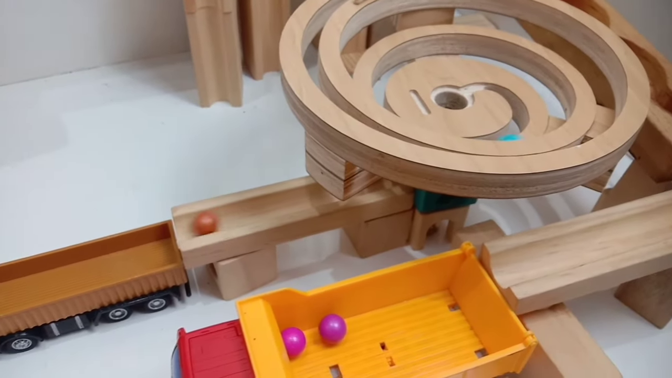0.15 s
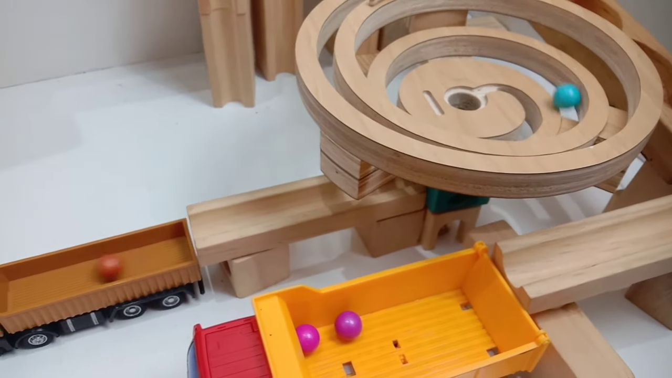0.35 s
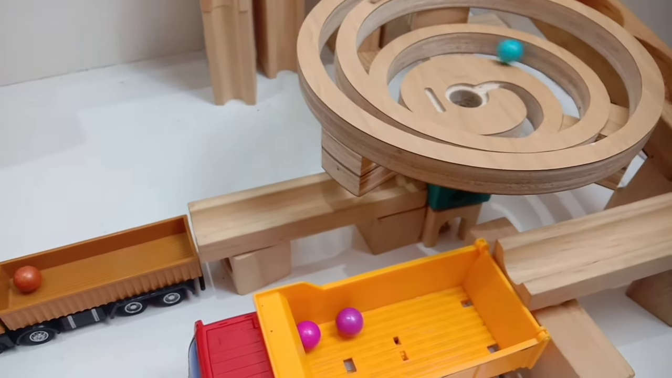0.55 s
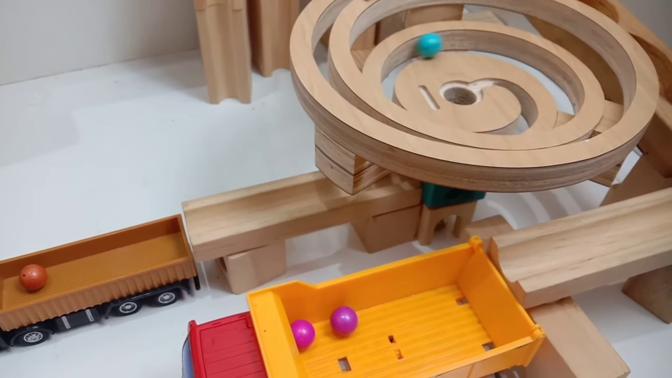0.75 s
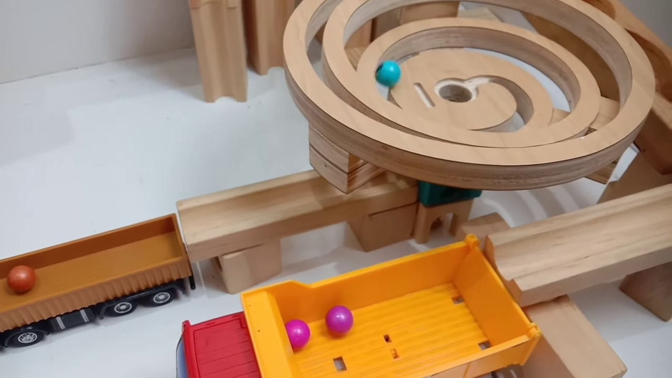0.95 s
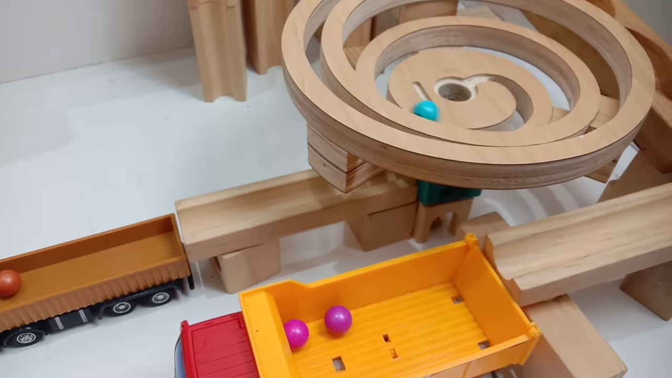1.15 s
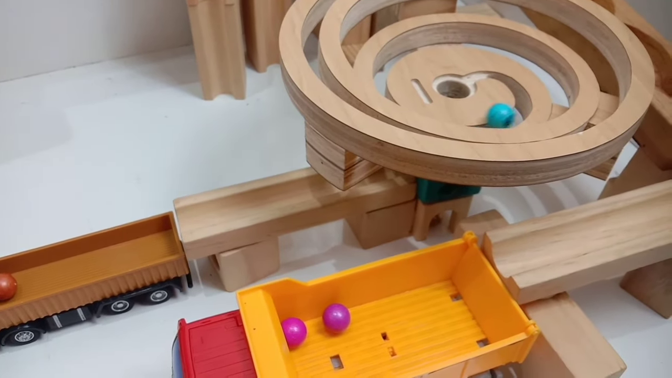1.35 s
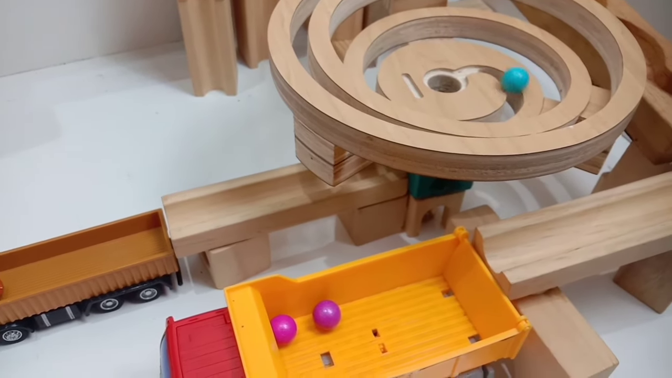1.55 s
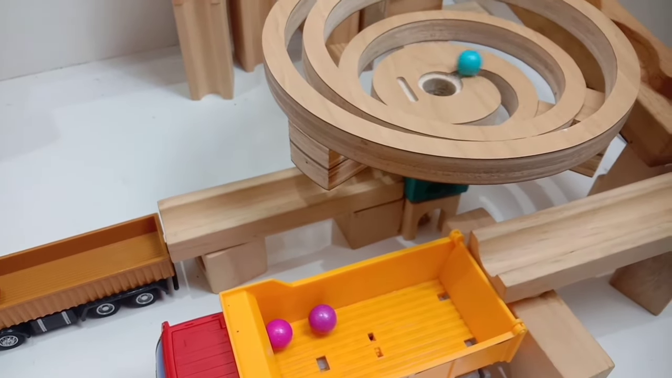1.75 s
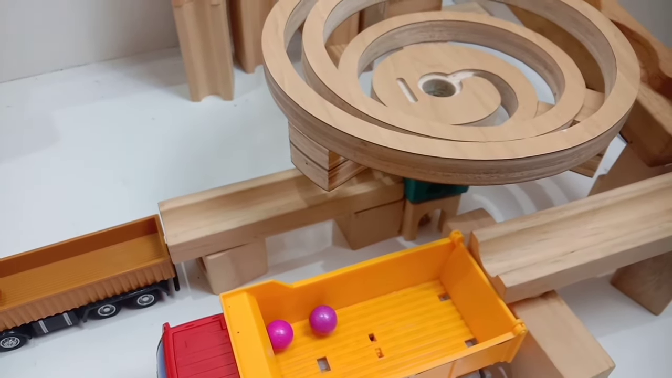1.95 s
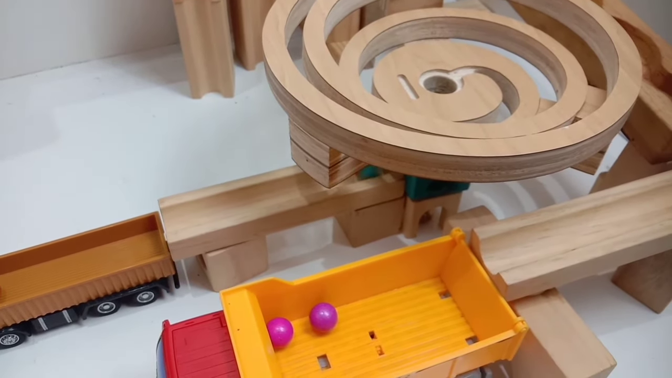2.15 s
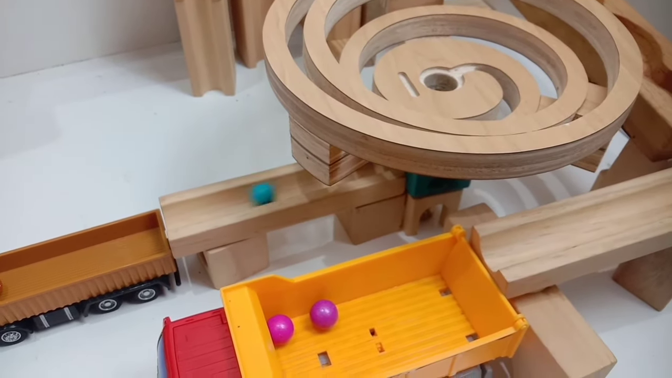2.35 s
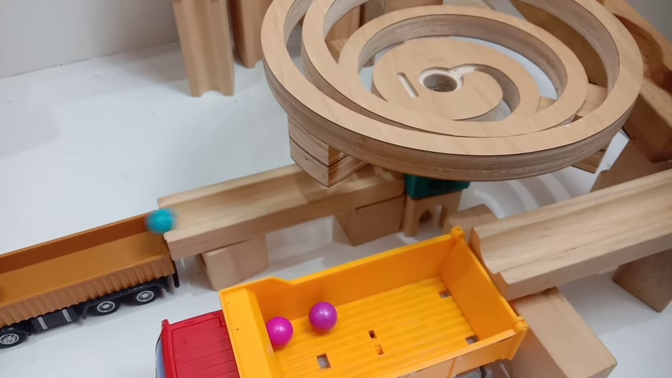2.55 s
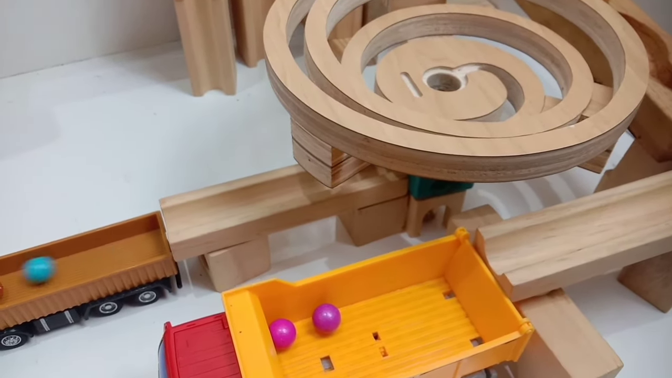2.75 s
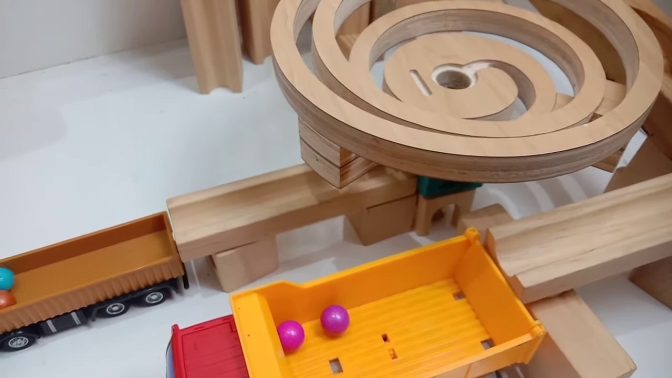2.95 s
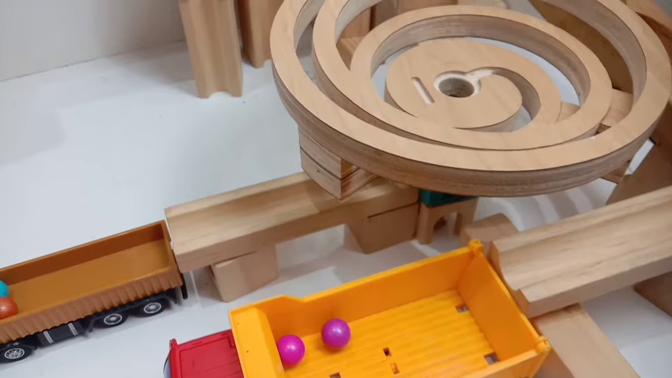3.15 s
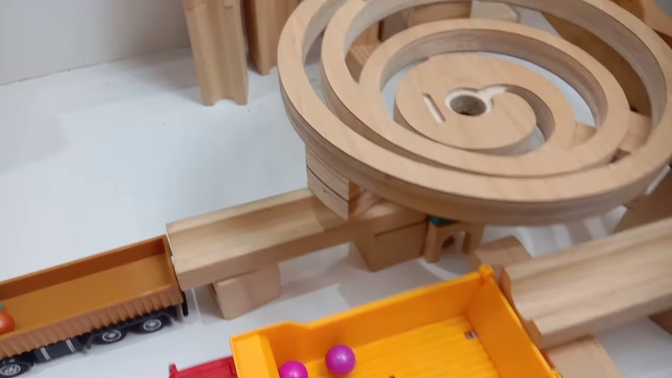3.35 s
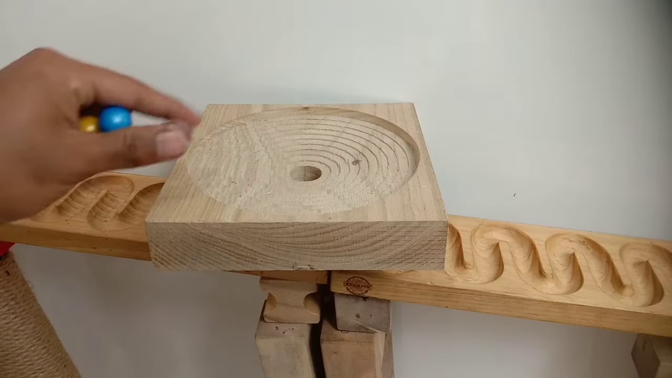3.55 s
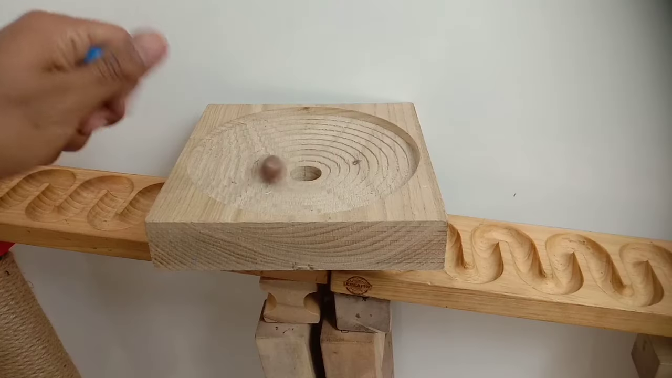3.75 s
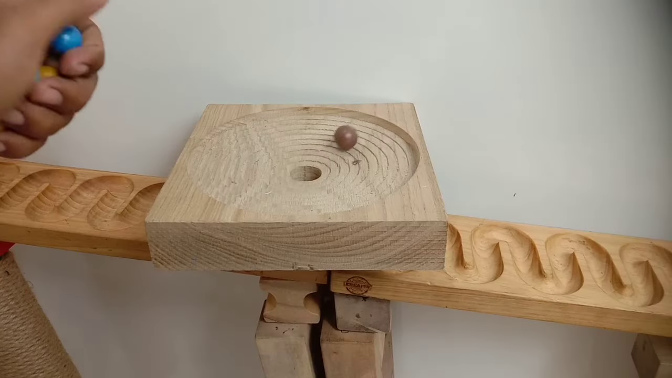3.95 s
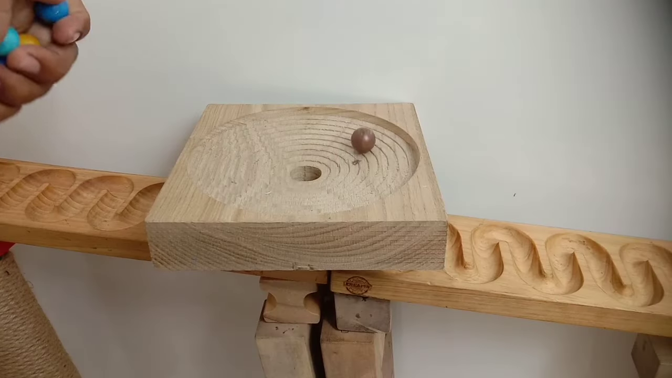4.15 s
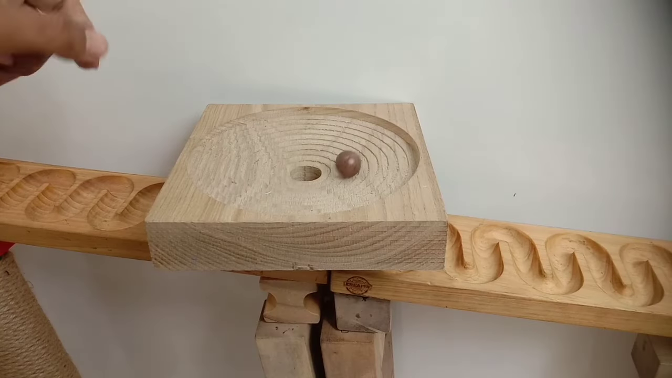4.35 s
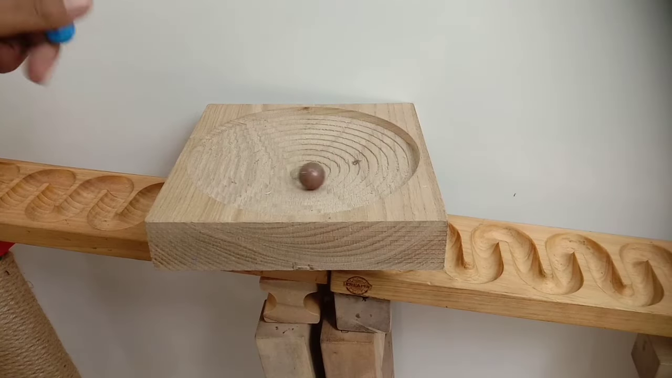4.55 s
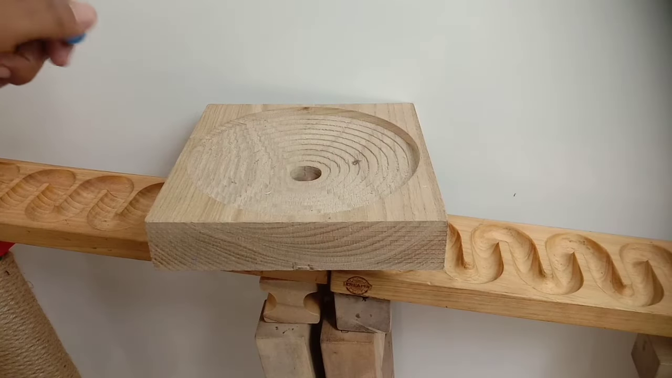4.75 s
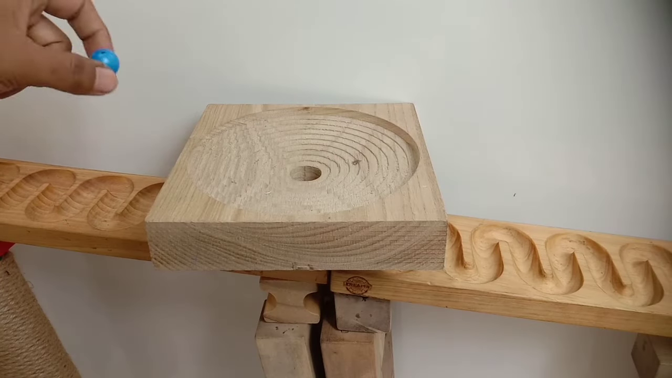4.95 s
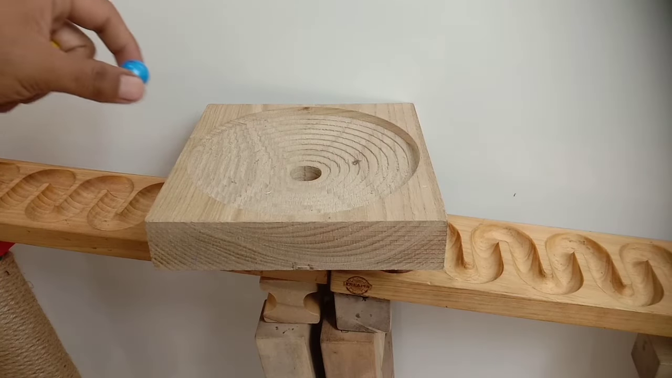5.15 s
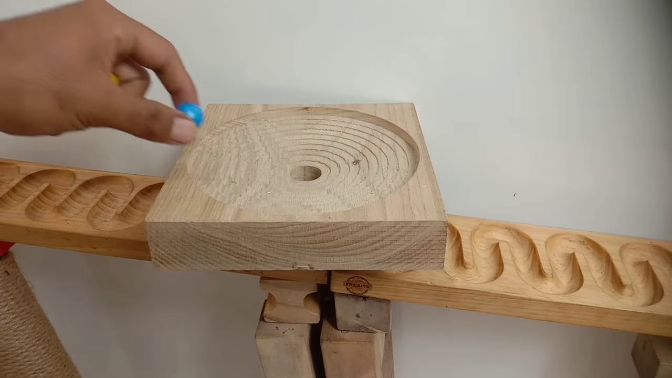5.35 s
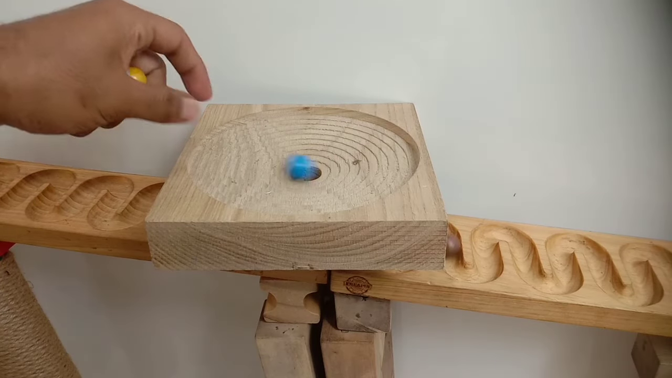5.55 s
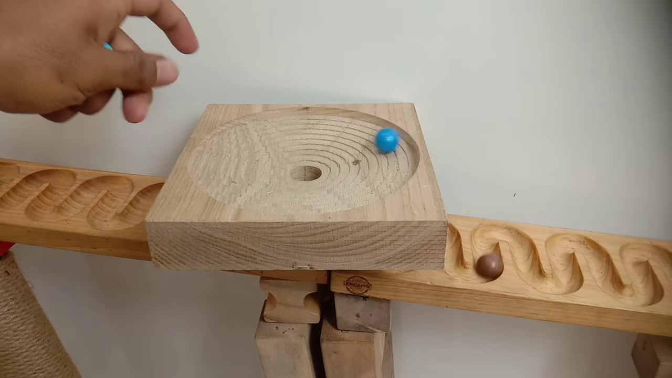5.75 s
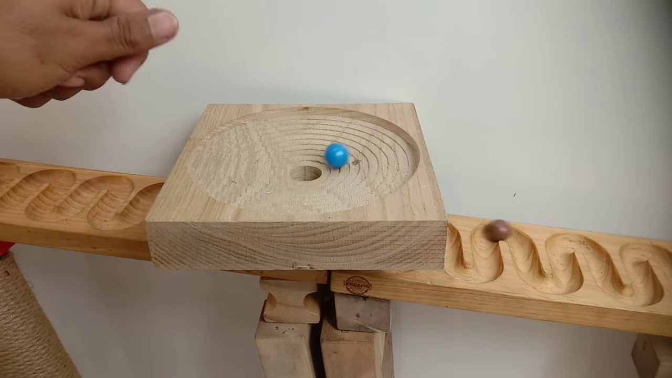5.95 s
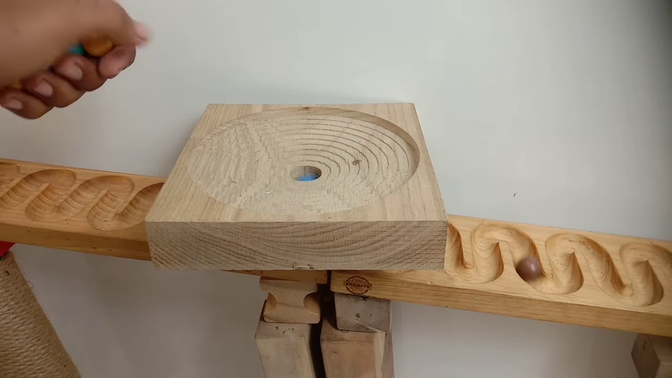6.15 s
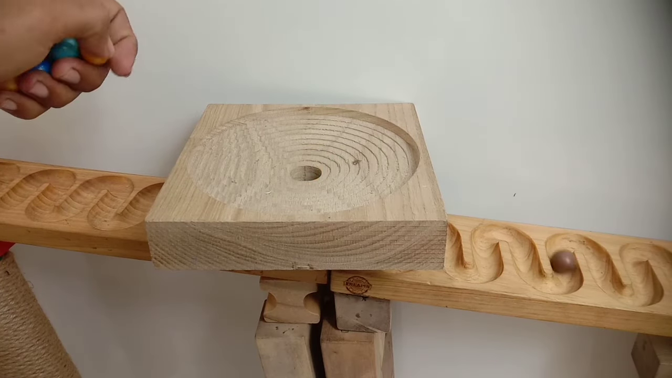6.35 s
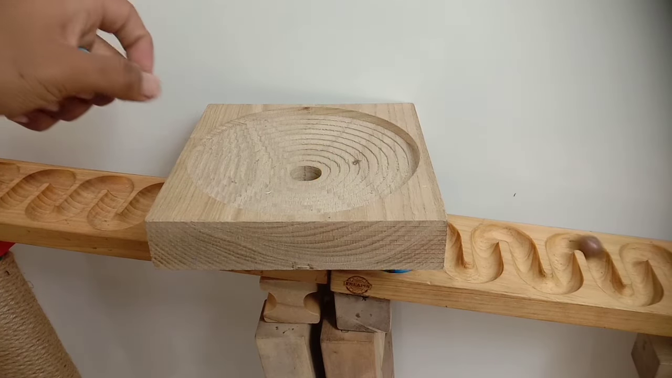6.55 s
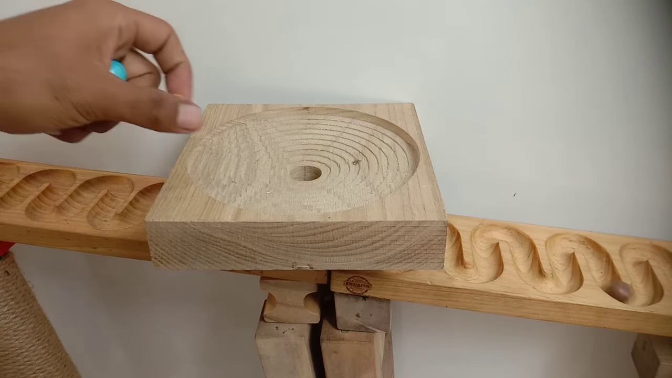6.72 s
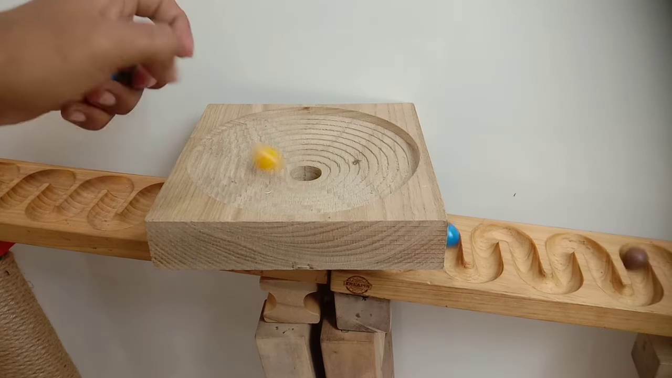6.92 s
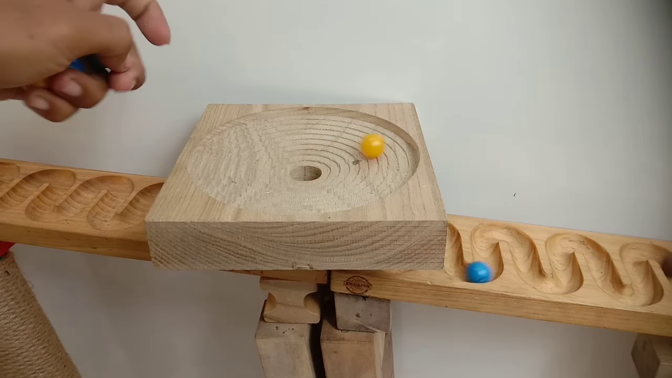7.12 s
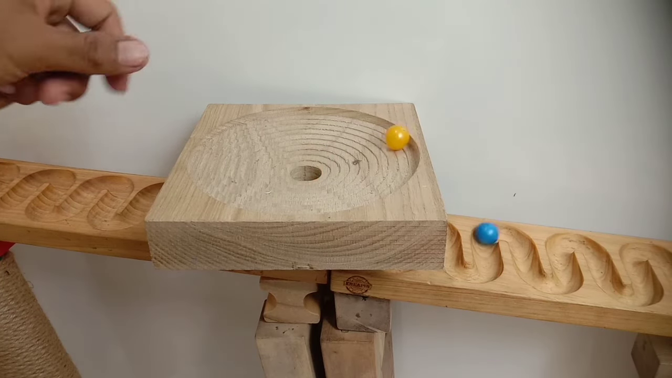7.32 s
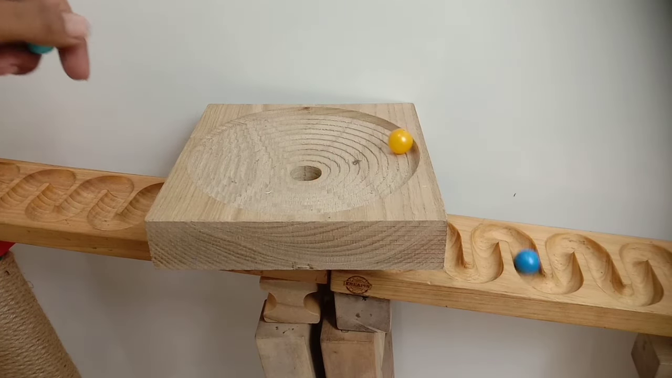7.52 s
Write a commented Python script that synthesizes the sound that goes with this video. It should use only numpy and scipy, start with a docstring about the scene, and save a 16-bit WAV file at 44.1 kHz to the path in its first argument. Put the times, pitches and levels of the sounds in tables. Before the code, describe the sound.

A marble circles a wooden spiral, drops down a chute and clatters into a plastic toy truck, then others knock through a wooden bowl and zigzag.

```python
"""A small, hard room with two wooden marble runs, heard one after the other.
On the first, a marble circles a spiral, drops down a chute and clatters into a plastic toy truck.
Abruptly the second takes over: marbles bounce in a thick wooden bowl, drop onto blocks and steps and
knock along a zigzag groove. Blows are noise cracks plus damped modes; rolling is a stream of tiny
bumps ringing the wood; the support booms, walls add reflections, and a quiet hush lies beneath."""
import sys
import numpy as np
from scipy import signal
from scipy.fft import rfft, irfft
from scipy.io import wavfile
from scipy.ndimage import uniform_filter1d

SR = 44100
rng = np.random.default_rng(int(sys.argv[2]) if len(sys.argv) > 2 else 0)


def dump_mix(stems):
    """Bounce the given channels to the path in sys.argv[1] as a 16-bit WAV at rate SR."""
    frames = np.atleast_2d(stems).T  # one column per channel
    limited = np.clip(frames, -1, 1)  # hard clip at full scale
    pcm = np.round(limited * 32767).astype(np.int16)
    wavfile.write(sys.argv[1], SR, pcm)


N = 338688

CHANGE_S = 3.43  # the second run takes over
EDGE_HZ = 16000  # upper band limit

# Table levels are relative: each part or track adds its own trim. Blows on each part: (time [s], clack level
# [dB], treble re clack [dB], bass re clack [dB]) The chute's table also holds the weak knocks at 3.17-3.34 s:
# marbles knocking in the truck's trailer, played with the chute's colour
TRUCK_HITS = [(.2654, -14, 1.5, -19), (.5047, -14.5, 2, -16.5), (2.6095, -25.5, 10.5, -18),
              (2.6127, -15, -1, -23.5), (2.783, -24.5, 9.5, -16.5), (2.789, -15, 3, -18.5),
              (2.899, -25.5, -2, -17.5), (2.9917, -26.5, -3.5, -15.5)]
SPIRAL_HITS = [(.925, -55, -3, -13), (1.0195, -43, -7, 7), (1.1035, -37.5, -4.5, -17),
               (1.1397, -39, -7, -10), (1.2055, -38, 1, -12), (1.2613, -39.5, -11, -13),
               (1.297, -44.5, -12, -5), (1.446, -42, -13.5, -14), (1.491, -43, -18, -2),
               (1.655, -44.5, -10, 7)]
CHUTE_HITS = [(1.845, -52, -8, 19), (1.899, -51, -6.5, 8), (1.9238, -16, 1, 0.5), (1.9992, -21.5, -8, 6.5),
              (2.0145, -22, 2, -4.5), (2.1275, -26.5, -15.5, 7), (2.1725, -16.5, -9.5, -4.5),
              (2.421, -56, -9.5, 11), (3.1696, -44.5, -0.5, 4.5), (3.277, -44, -3.5, 0.5),
              (3.344, -39.5, -2.5, 4), (3.3697, -18.5, 5, -2), (3.396, -21.5, 15, 11.5),
              (3.419, -19.5, 0.5, -4.5)]
BOWL_HITS = [(3.5906, -25.5, -3, -11.5), (3.603, -21.5, 2, -10), (3.6807, -20.5, -8, -11),
             (3.7437, -20.5, -6.5, -10.5), (3.791, -40, -16, 1), (3.809, -37, -1.5, 6.5),
             (3.835, -37, -6, 4.5), (3.8615, -27.5, -12.5, -16), (3.8825, -24.5, -10, -11),
             (3.9263, -26.5, -9.5, -12), (4.1495, -50, -11, 13), (4.1925, -66, -22, 15.5),
             (4.5997, -48, -27, 5), (4.6544, -37.5, -11, -0.5), (4.7447, -35, -5.5, -5),
             (5.4675, -16.5, 0, -7.5), (5.519, -28.5, -9.5, -9), (5.5445, -37, 1, -11),
             (5.635, -40.5, 3.5, 10), (5.6852, -30.5, -1.5, 3), (5.7207, -32.5, -1, 9.5),
             (5.946, -39.5, -15, -6), (5.98, -41.5, -10, -2), (6.014, -27, -12.5, -10),
             (6.1063, -27, -0.5, -13), (6.8418, -15.5, -3.5, -9), (6.9301, -16, -6, -11.5),
             (6.9933, -16, -1.5, -10), (7.061, -16.5, -5.5, -16)]
BLOCK_HITS = [(4.2635, -15.5, -6, -4), (4.305, -28, -7, -1.5), (4.3388, -31.5, -5, 10.5),
              (4.349, -40, -4, -5), (4.47, -76, -14, 16), (4.543, -72, -13, 26.5), (4.57, -68.5, -11, 15)]
ZIGZAG_HITS = [(4.999, -20, -1, -9), (5.0829, -18.5, 0.5, -3.5), (5.525, -27.5, -12, -11.5),
               (6.0655, -33.5, -17, -11), (6.3233, -31.5, -16, -10.5), (6.3752, -30.5, 0.5, 3),
               (6.407, -24, -11, -4), (6.429, -22.5, -12, -23), (6.4345, -20.5, 2, -14),
               (6.471, -32, 4.5, -2), (6.485, -27.5, -12, -5.5), (6.4985, -31.5, -12, -8),
               (6.52, -39.5, -10, -0.5), (6.609, -40, -16, -4), (6.629, -30.5, -13.5, -8),
               (6.719, -31.5, -12, -9.5), (6.7393, -33, -11.5, -4), (6.808, -44, -22, -6.5),
               (7.1002, -30.5, -8, -10), (7.1555, -31.5, -3, -15), (7.1902, -30, -13.5, -9),
               (7.231, -42, -2, 10), (7.277, -51, -14, 3), (7.3337, -56, -26, 5), (7.355, -44, -23, -16),
               (7.429, -47, -20, -3), (7.4675, -28, -7, -12.5), (7.507, -41, -13, -14),
               (7.5546, -38.5, -4, -9), (7.5907, -31, -13, -8), (7.605, -28, -2, -10), (7.618, -42, -7, 1)]
# The loose truck jumps and rattles just after a marble lands in it: same columns
TRUCK_RATTLES = [(.3165, -19, -4.5, -13), (2.657, -19.5, -3.5, -10.5)]
# Steps and edges, where every spot has two pitches of its own:
# (time [s], clack level [dB], treble re clack [dB], bass re clack [dB], hollow pitch [Hz], bright pitch [Hz])
STEP_HITS = [(4.008, -29, -15.5, 1.5, 1300, 2640), (4.7613, -18, -9.5, -3, 1254, 2770),
             (4.778, -31, -14, -0.5, 1490, 2880), (4.8285, -24.5, -12.5, 0, 1236, 2130),
             (4.835, -26.5, -20, -3.5, 1530, 2880), (4.887, -26.5, -8.5, -6.5, 1300, 2480),
             (4.9014, -33.5, -16.5, 13, 1290, 2950), (4.951, -42, -14, 0, 1280, 3250),
             (4.9614, -18, -3.5, -2, 1240, 5910), (5.0326, -18.5, -5, 1, 1110, 4130),
             (5.1386, -17, -0.5, -2.5, 1547, 5905), (5.794, -37.5, -16, -8, 1050, 1980),
             (5.805, -33.5, -4.5, 1, 1060, 2410), (6.1363, -29, -9, -7.5, 1220, 3280),
             (6.1654, -40, -4, 3, 1230, 3250), (6.183, -23.5, -8, -6.5, 1280, 3230),
             (6.1895, -20, -11, -2, 1330, 2880), (6.212, -30, -25, -5, 1230, 2560),
             (6.2517, -39, -17, 0, 1470, 2400), (6.291, -35, -11.5, 6, 1260, 2760)]
# How those two pitches ring, before weak blows shorten them: (level [dB], t60 [s])
SPOT_RINGS = [(9.5, 0.022), (2, 0.022)]

# Colour of the crowded, short-lived modes in each part: (frequency [Hz], density [dB per Hz])
TRUCK_BODY = [(47, -60), (80, -6), (156, -20), (212, -9), (271, -21), (461, -30), (751, -17), (958, -21),
              (1430, -7), (3390, -3.5), (4420, 0.5), (5050, -5.5), (6740, 0.5), (8050, -15), (16000, -33.5)]
SPIRAL_BODY = [(300, -18.5), (1500, 13), (3500, 2.5), (4600, 4), (5200, -22.5), (5800, 3), (7200, -5),
               (8500, -44), (15000, -49.5)]
CHUTE_BODY = [(47, -43.5), (80, -22.5), (212, -5), (431, -14), (588, -7), (896, -8), (1250, -2.5),
              (1630, -0.5), (2540, -2), (2780, 1), (3870, -9), (6170, -5), (6740, -10.5), (14600, -51),
              (16000, -101)]
BOWL_BODY = [(90, -15), (300, -2.5), (750, 1), (1100, 8.5), (2100, 3), (2700, 8), (4000, 6.5), (5200, -6),
             (6200, -2.5), (7000, -8), (8000, -25), (10000, -46), (15000, -48)]
BLOCK_BODY = [(90, -25), (230, -5), (400, -1.5), (570, -1), (1200, 0), (1600, -9), (2400, -7), (3000, -5.5),
              (3400, -6.5), (3800, -4), (5000, -10.5), (6300, -12), (7000, -12), (7800, -29), (15000, -35)]
STEP_BODY = [(88, -16.5), (150, -26), (193, -12.5), (348, -9), (494, -18.5), (730, -6), (923, -13.5),
             (1260, 0.5), (1720, -16.5), (1870, -9), (6020, -15.5), (8400, -27.5), (13200, -38),
             (14800, -34), (16000, -44.5)]
ZIGZAG_BODY = [(47, -24), (80, -37.5), (242, -4.5), (493, -19.5), (657, -4), (958, -10), (1250, -11.5),
               (1700, -12.5), (1860, -6.5), (2720, -9.5), (3170, -5), (4420, -16.5), (6450, -20),
               (7200, -39), (16000, -92.5)]

# Clear modes of each part, before detuning and damping: (frequency [Hz], level [dB], t60 [s])
TRUCK_MODES = [(1290, -3, 0.033), (2120, 0, 0.084), (3810, 10.5, 0.022), (4403, -9, 0.058),
               (4600, -17.5, 0.028), (5790, 14, 0.019), (5770, -13, 0.027), (6000, -12, 0.017)]
SPIRAL_MODES = [(582, -3, 0.17), (650, -11.5, 0.045), (985, 0, .05), (1565, 2, 0.013)]
CHUTE_MODES = [(595, -6, .08), (1010, -9, .06), (1253, -3, .06), (2750, -1, .09), (4830, -14, .07),
               (5290, -6, .04), (5960, 4, .03), (6150, 2, .03)]
BOWL_MODES = [(1012, -11, .13), (1088, -12, .13), (1238, -15, .08), (2070, -20, .09), (2565, -11, .09),
              (2880, -18, .04), (3245, -2, .11), (3295, -4, .07), (3430, -11, .045), (3596, -14, .06),
              (4016, -5, .1), (4780, -18, .07), (5930, -15, .06), (6420, -15, .07)]
BLOCK_MODES = [(577, 1, .1), (715, -1, .08), (1235, -2, .2), (3040, -2, .14), (3100, -5, .1),
               (3740, -3, .06), (4890, -5, .12), (4970, -7, .1), (6900, -17, .1)]
STEP_MODES = [(1000, -13.5, 0.04), (1280, -15, 0.15), (1491, -11.5, 0.21), (3010, -10, 0.028)]
ZIGZAG_MODES = [(1250, -6, 0.13), (1835, 3, 0.11), (2360, -1, 0.06), (3050, -5, 0.05), (3240, 2, 0.1),
                (4070, -5, 0.04), (4840, -4, 0.035), (6380, -10, 0.04)]
# Modes that rolling excites: (frequency [Hz], level [dB], t60 [s])
BOWL_ROLL_MODES = [(940, -8, 0.18), (1096, 24, 0.17), (1240, 18.5, 0.3), (2600, -24, 0.038),
                   (3180, -23.5, 0.092)]
ZIGZAG_ROLL_MODES = [(250, -4, 0.1), (645, 4, 0.1), (1260, 0, 0.12), (1850, 9, 0.1), (1950, 4, 0.08),
                     (2360, -2, 0.06), (3240, 0, 0.1)]
RAMP_MODES = [(230, -1, 0.21), (356, 7, 0.2), (543, -1.5, 0.14), (762, 0.5, 0.27), (1160, -8, 0.043)]

# Stretches of rolling on each track: (start [s], end [s], wood level [dB], grit level [dB])
SPIRAL_ROLL = [(0, 1.86, -36, -62)]
BOWL_ROLL = [(3.58, 3.72, -38, -68), (3.74, 4.02, -37, -70), (4.13, 4.23, -38.5, -71),
             (4.58, 4.76, -51.5, -79), (5.48, 5.66, -36, -62), (5.72, 5.79, -31.5, -66),
             (5.97, 6.1, -43.5, -63), (6.92, 7.14, -39, -59), (7.23, 7.28, -46, -62)]
ZIGZAG_ROLL = [(5.75, 5.88, -55, -77), (6.13, 6.26, -38.5, -60), (6.29, 6.53, -39, -60),
               (6.61, 6.66, -45, -68), (6.73, 6.82, -41, -73), (7.1, 7.28, -43.5, -58),
               (7.32, 7.42, -47.5, -70), (7.43, 7.68, -43, -50)]
RAMP_ROLL = [(-.05, .08, -32, -47), (.1, .21, -38.5, -52.5), (2.2, 2.4, -41.5, -81),
             (2.41, 2.51, -32.5, -77.5), (3.28, 3.4, -47, -65), (3.54, 3.59, -45, -82),
             (4.14, 4.24, -49.5, -70.5), (4.35, 4.44, -46, -80), (4.54, 4.86, -41.5, -87.5)]
# Colour of the rolling noise in the wood: (frequency [Hz], density [dB per Hz])
SPIRAL_RUMBLE = [(40, -34.5), (100, -12), (210, -5.5), (320, -11), (480, -2), (600, 4.5), (800, -7.5),
                 (1100, -3), (1700, -12.5), (2500, -22.5), (4500, -30.5), (7000, -46), (10000, -77)]
BOWL_RUMBLE = [(40, -34), (100, 17), (170, -1), (330, 10), (500, -21), (750, 5.5), (900, -2.5),
               (1100, 14.5), (1350, -15), (1650, -10), (2700, -15.5), (5000, -42.5), (7000, -45),
               (10000, -57.5)]
ZIGZAG_RUMBLE = [(40, -29.5), (100, -3.5), (170, -3.5), (320, 9), (480, -11), (660, 1), (950, -3.5),
                 (1300, -5.5), (1900, 0.5), (2800, -16), (5000, -43), (6500, -25), (9000, -66)]
RAMP_RUMBLE = [(40, -24), (110, -4.5), (210, 6.5), (300, -3), (480, 0), (800, -2), (1250, -6), (1800, -34),
               (3500, -41), (7000, -40), (10000, -80.5)]
# Loudness of the circling marble: (time [s], level [dB])
SPIRAL_SWELL = [(0, -5.5), (.6, -1), (.75, -0.5), (1, 0.5), (1.15, 4), (1.32, 1.5), (1.42, -1.5), (1.6, -3),
                (1.68, 3.5), (1.8, 1), (1.85, 1)]

# Two heavy drops make the whole support boom: (time [s], level [dB])
HEAVY_DROPS = [(4.968, -34.5), (5.038, -33)]
# Low modes of the support: (frequency [Hz], level [dB], t60 [s])
SUPPORT_MODES = [(91.6, -2.5, .45), (115, 8, .5), (140, -10, .4), (212, -9, .27)]
# Decay of the room: (frequency [Hz], t60 [s])
ROOM_T60 = [(100, 0.56), (400, 0.42), (1200, 0.26), (3500, 0.24), (7000, 0.22), (14000, 0.19)]
# Colour of the background hush: (frequency [Hz], density [dB per Hz])
HUSH = [(30, -27.5), (110, -0.5), (400, -18.5), (1200, -3.5), (3000, -23.5), (7000, -27.5), (13000, -36.5),
        (15000, -25)]

# the sharpest clacks reach furthest above the treble
SHEEN_PER_DB = 0.98  # dB per dB of treble
# blows weaker than HARD_DB stay longer in contact, which shortens the ring
HARD_DB, DAMPING_PER_DB = -22.5, 0.06
# a wall's echo, whose delay shifts as the marble travels
ECHO_S, ECHO_SWING_S, ECHO_DB = .0045, 0.00055, -7.5


def spiral_run():
    """First run: a marble rolls round the spiral, strikes its way down the chute and into the truck."""
    roll = rolling(SPIRAL_ROLL, SPIRAL_RUMBLE, SPIRAL_MODES, level_db=-4.0, ring_db=-1, grit_db=4.5,
                   rise_s=.03, slowing_db_per_s=2, release_s=0.18,
                   bumps_per_s=1500, wobble_db=2, ridge_db=8, wander=.04)
    swell = amp(np.interp(np.arange(N) / SR, *np.transpose(SPIRAL_SWELL)))
    spiral = knocks(SPIRAL_HITS, SPIRAL_BODY, SPIRAL_MODES, level_db=-3.5, crack_t60=0.062,
                    ring_db=-10.5, room_db=-7.5, sheen_db=15, thump_db=-32)
    chute = knocks(CHUTE_HITS, CHUTE_BODY, CHUTE_MODES, level_db=-3.0, crack_t60=0.056,
                   ring_db=-5, room_db=-4.5, sheen_db=-9, thump_db=-28,
                   chatter_s=0.054, chatter_db=-16, count=4)
    truck = knocks(TRUCK_HITS, TRUCK_BODY, TRUCK_MODES, level_db=-2.0, crack_t60=0.029,
                   ring_db=-4.0, room_db=-4.5, sheen_db=-2.5, thump_db=-39.5)
    rattle = knocks(TRUCK_RATTLES, TRUCK_BODY, TRUCK_MODES, level_db=-4.5, crack_t60=0.033,
                    ring_db=-4.0, room_db=-1, sheen_db=3, thump_db=-23.5,
                    chatter_s=.045, chatter_db=-4.5, count=4)
    return whistle() + roll * swell + spiral + chute + truck + rattle


def bowl_run():
    """Second run: marbles strike and roll in the bowl, land on blocks and steps, and follow the zigzag."""
    bowl_roll = rolling(BOWL_ROLL, BOWL_RUMBLE, BOWL_ROLL_MODES, level_db=-0.5, ring_db=-2.0, grit_db=-10.0,
                        rise_s=0.015, slowing_db_per_s=-9, release_s=0.13,
                        bumps_per_s=500, wobble_db=4, wander=.02)
    zigzag_roll = rolling(ZIGZAG_ROLL, ZIGZAG_RUMBLE, ZIGZAG_ROLL_MODES, level_db=2, ring_db=4.5, grit_db=-2.5,
                          rise_s=0.022, slowing_db_per_s=-4, release_s=0.14,
                          bumps_per_s=400, wobble_db=4.5, ridge_db=15, wander=.015)
    # the thick, solid bowl rings clearly
    bowl = knocks(BOWL_HITS, BOWL_BODY, BOWL_MODES, level_db=-3, crack_t60=.045,
                  ring_db=5, room_db=-7.0, sheen_db=10.0, thump_db=-32.5)
    block = knocks(BLOCK_HITS, BLOCK_BODY, BLOCK_MODES, level_db=-0.5, crack_t60=0.019,
                   ring_db=0.0, room_db=-5.5, sheen_db=-6, thump_db=-27.5)
    steps = knocks(STEP_HITS, STEP_BODY, STEP_MODES, level_db=-3.0, crack_t60=0.042,
                   ring_db=3.5, room_db=-6.5, sheen_db=-2.5, thump_db=-29.5,
                   chatter_s=.035, chatter_db=-21.5, count=3)
    zigzag = knocks(ZIGZAG_HITS, ZIGZAG_BODY, ZIGZAG_MODES, level_db=-2.5, crack_t60=0.096,
                    ring_db=5.0, room_db=-9.5, sheen_db=8.0, thump_db=-33.5)
    return bowl_roll + zigzag_roll + bowl + block + steps + zigzag


def knocks(hits, body, modes, level_db, crack_t60, ring_db, room_db, sheen_db, thump_db,
           chatter_s=.012, chatter_db=-12, count=1, contact_s=0.00078):
    """Each blow cracks with crowded modes, rings the clear ones, chatters and shakes the support."""
    t = np.arange(SR // 5) / SR
    out = np.zeros(N)
    for s, clack_db, treble_db, bass_db, *spot_hz in hits:
        crack = colour(rng.standard_normal(len(t)) * dying(t, crack_t60), body)
        own_modes = modes + [(hz, db, t60) for hz, (db, t60) in zip(spot_hz, SPOT_RINGS)]
        # each mode is slightly detuned; weak blows damp it
        free = np.exp(DAMPING_PER_DB * min(clack_db - HARD_DB, 0))
        own_modes = [(hz * rng.uniform(.994, 1.006), db, t60 * free) for hz, db, t60 in own_modes]
        tone = ring(own_modes, t, spread_db=2.5)
        contact = 1 - np.exp(-(t / contact_s) ** 2)  # soft onset
        touch = (evened(crack) + amp(ring_db) * evened(tone)) * contact
        # the marble touches again, count times; later touches are weaker
        blow = touch.copy()
        for late in rng.uniform(.25, 1, count):
            add(blow, chatter_s * late, amp(chatter_db) * (1.5 - late) * touch)
        out_of_balance = tone_balance(blow, treble_db, bass_db, sheen_db)
        blow = colour(blow, out_of_balance)
        add(out, s, blow * amp(level_db + clack_db - band_db(blow, 1500, 12000)))
    booms = thumps([(s, clack_db + thump_db) for s, clack_db, *_ in hits])
    return out + amp(room_db) * room(out) + booms


def tone_balance(blow, treble_db, bass_db, sheen_db):
    """Equaliser curve that steers a blow's bass and treble relative to its clack."""
    clack_now_db = band_db(blow, 1500, 12000)
    low_db = bass_db + clack_now_db - band_db(blow, 150, 1300)
    high_db = treble_db + clack_now_db - band_db(blow, 4000, 12000)
    top_db = high_db + sheen_db + SHEEN_PER_DB * treble_db
    return [(40, low_db - 17.5), (100, low_db), (1200, low_db), (2200, 0), (3300, 0),
            (4200, high_db), (7000, high_db), (8400, top_db)]


def rolling(stretches, rumble, modes, level_db, ring_db, grit_db, bumps_per_s, wobble_db,
            rise_s, slowing_db_per_s, release_s, ridge_db=12.5, wander=.01):
    """The marble trips over the wood grain: tiny bumps ring the track, and the sharpest hiss."""
    t = np.arange(N) / SR
    wood_gain, grit_gain = np.zeros(N), np.zeros(N)
    for start, end, roll_db, tick_db in stretches:
        motion = stretch(start, end, rise_s, slowing_db_per_s, release_s)
        wood_gain += amp(level_db + roll_db) * motion
        grit_gain += amp(grit_db + tick_db) * motion
    # the contact force wobbles as the marble rocks from wall to wall
    force = amp(wobble_db * drift(45))
    bumps = force * rng.standard_normal(N) * (rng.random(N) < bumps_per_s / SR)
    # now and then, about 30 times a second, it skips over a larger ridge
    ridges = amp(ridge_db + rng.uniform(-6.5, 6.5, N)) * (rng.random(N) < 30 / SR)
    bumps = bumps + ridges
    # along the track each mode comes and goes
    rung = np.zeros(N)
    for mode in modes:
        excitation = bumps * amp(3.5 * drift(14))
        rung += signal.oaconvolve(excitation, ring([mode], t[:SR // 4], spread_db=1))[:N]
    wood = evened(evened(colour(bumps, rumble)) + amp(ring_db) * evened(rung))
    # the pitch of the wood wanders
    place = np.cumsum(1 + wander * drift(6)) % N
    wood = np.interp(place, np.arange(N), wood) * wood_gain
    # the grit has the spiral's colour on every track
    grit = evened(colour(bumps * force + ridges, SPIRAL_BODY)) * grit_gain
    sound = travelling(wood + grit)
    return 0.72 * sound + 0.37 * room(sound)


def stretch(start, end, rise_s, slowing_db_per_s, release_s):
    """Gain that builds up, drifts as the marble slows or gathers speed, and dies away after the end."""
    t = np.arange(N) / SR
    age = np.maximum(t - start, 0)
    rise = np.minimum(age / rise_s, 1)
    return rise * amp(-slowing_db_per_s * age) * dying(np.maximum(t - end, 0), release_s)


def whistle(start=1.8, end=2.43, hz=4660, waver_hz=40, level_db=-57):
    """A thin sine around the chute drop, its pitch wavering with smoothed noise."""
    pitch = hz + waver_hz * evened(uniform_filter1d(rng.standard_normal(N), size=300))
    level = amp(level_db) * stretch(start, end, rise_s=0.02, slowing_db_per_s=9, release_s=0.026)
    return level * np.sin(2 * np.pi * np.cumsum(pitch) / SR)


def ramp_rolls():
    """Marbles roll on the straight ramps of both runs, each stretch fading as it goes."""
    return rolling(RAMP_ROLL, RAMP_RUMBLE, RAMP_MODES, level_db=-3.0, ring_db=-5.0, grit_db=10.5,
                   bumps_per_s=7100, wobble_db=4.5, rise_s=0.035, slowing_db_per_s=21.5, release_s=0.087)


def thumps(rows, swell_s=0.011):
    """The support swells into a low boom of damped modes under each landing."""
    t = np.arange(SR // 2) / SR
    out = np.zeros(N)
    for s, db in rows:
        swell = 1 - np.exp(-(t / swell_s) ** 2)
        add(out, s, amp(db) * swell * ring(SUPPORT_MODES, t, spread_db=1))
    return out


def travelling(x):
    """The moving echo sweeps a comb through the sound."""
    n = np.arange(N)
    delay = SR * (ECHO_S + ECHO_SWING_S * drift(4))
    echo = np.interp(n - delay, n, x)
    return (x + amp(ECHO_DB) * echo) / np.hypot(1, amp(ECHO_DB))


def room(x, onset_s=0.0036):
    """Reflections from close walls thicken into a tail that dies sooner in the treble."""
    t = np.arange(SR * 3 // 4) / SR
    taps = rng.standard_normal(len(t)) * (rng.random(len(t)) < .04 + t)
    hz, when, z = signal.stft(taps, SR, nperseg=256)
    z = z * dying(when, read(ROOM_T60, hz)[:, None])
    tail = signal.istft(z, SR, nperseg=256)[1][:len(t)]
    tail *= 1 - np.exp(-(t / onset_s) ** 2)
    return signal.oaconvolve(x, tail / np.linalg.norm(tail))[:N]


def background_hush():
    """Steady coloured noise at a very low level."""
    return amp(-67.5) * evened(colour(rng.standard_normal(N), HUSH))


def ring(modes, t, spread_db):
    """Damped sines; their strengths and signs depend on where the marble lands, drawn at random."""
    luck = rng.standard_normal((len(modes), 2))
    out = np.zeros(len(t))
    for (hz, db, t60), (spot, side) in zip(modes, luck):
        strength = np.sign(side) * amp(db + spread_db * spot)
        out += strength * dying(t, t60) * np.sin(2 * np.pi * hz * t)
    return out


def dying(t, t60):
    """Falls 60 dB in t60 seconds."""
    return np.exp(-np.log(1000) * t / t60)


def drift(per_s):
    """Smooth random curve with about per_s new values a second."""
    knots = rng.standard_normal(int(N / SR * per_s) + 2)
    place = np.arange(N) / SR * per_s
    eased = place - np.sin(2 * np.pi * place) / (2 * np.pi)
    return np.interp(eased, np.arange(len(knots)), knots)


def colour(x, spectrum):
    """Causal minimum-phase filter with the given (frequency [Hz], level [dB]) shape."""
    size = 2048
    cepstrum = irfft(np.log(amp(read(spectrum, np.fft.rfftfreq(size, 1 / SR)))))
    # folding the cepstrum puts the energy at the front
    cepstrum[1:size // 2] *= 2
    cepstrum[size // 2 + 1:] = 0
    return signal.oaconvolve(x, irfft(np.exp(rfft(cepstrum))))[:len(x)]


def band_db(x, lo, hi):
    """Level in one band of a blow's first 530 samples, about 12 ms."""
    band = signal.butter(3, [lo, hi], "band", fs=SR, output="sos")
    part = signal.sosfilt(band, x[:530])
    return 10 * np.log10(np.mean(part ** 2))


def amp(db):
    """Decibels to gain."""
    return 10 ** (np.asarray(db) / 20)


def evened(x):
    """Scales to rms 1."""
    return x / np.sqrt(np.mean(x ** 2) + 1e-20)


def read(points, hz):
    """Reads a table on a log-frequency axis."""
    f, value = np.transpose(points)
    return np.interp(np.log(hz + 1), np.log(f + 1), value)


def add(mix, s, sound):
    """Mixes a sound in at time s."""
    part = mix[max(round(s * SR), 0):][:len(sound)]
    part += sound[:len(part)]


def scene():
    """The first run stops dead where the second takes over; ramps, heavy drops and hush lie across both."""
    first = np.arange(N) / SR < CHANGE_S
    runs = np.where(first, spiral_run(), bowl_run())
    return (runs + ramp_rolls() + thumps(HEAVY_DROPS) + background_hush())[None]


def record(dry):
    """A steep low-pass removes everything well above the band limit."""
    low_pass = signal.firwin(255, EDGE_HZ, window=("kaiser", 8), fs=SR)
    return signal.oaconvolve(dry, low_pass[None], "same")


dry = scene()
out = record(dry)
dump_mix(out)
```